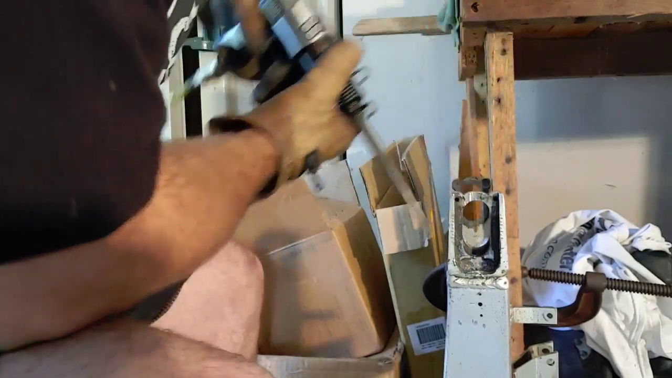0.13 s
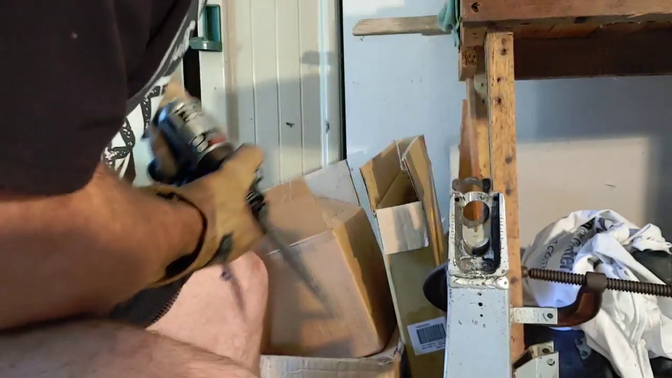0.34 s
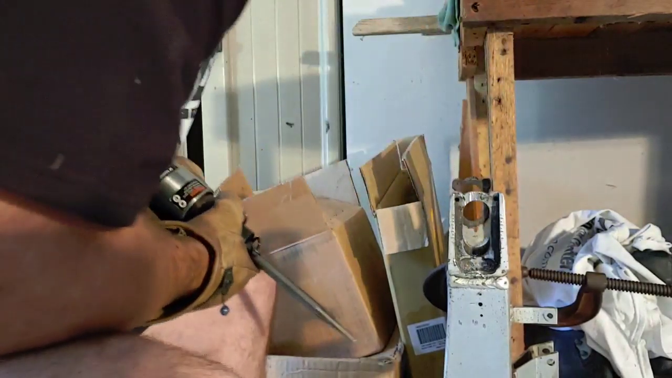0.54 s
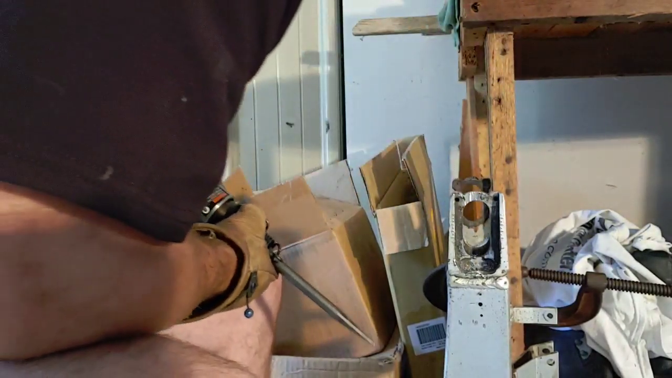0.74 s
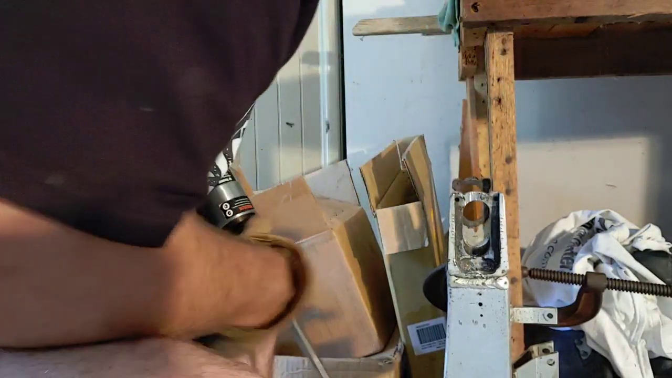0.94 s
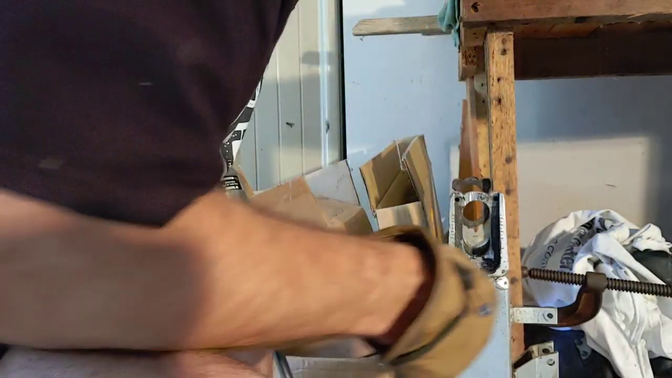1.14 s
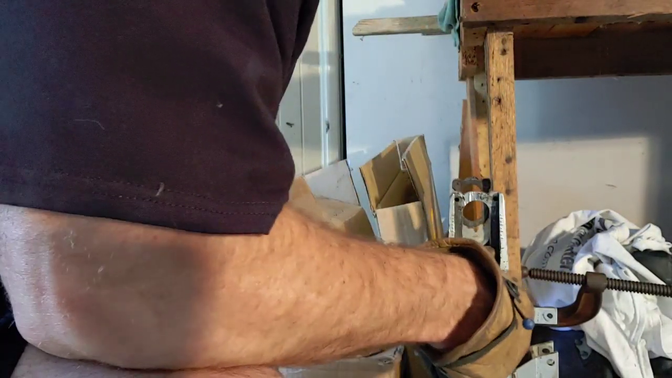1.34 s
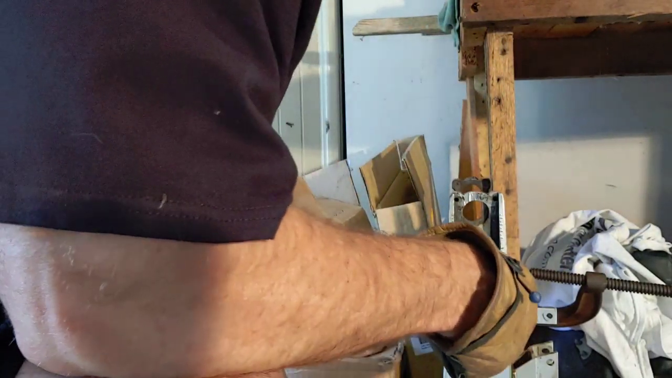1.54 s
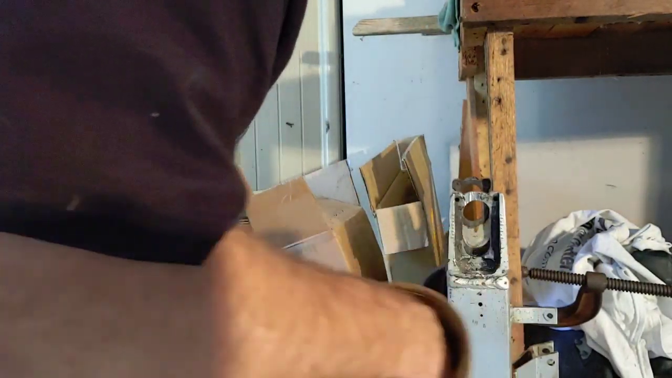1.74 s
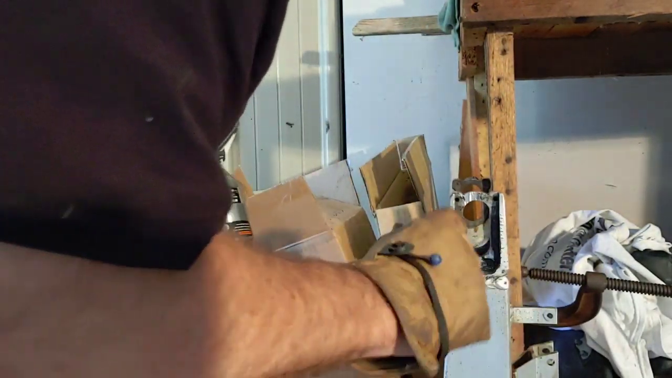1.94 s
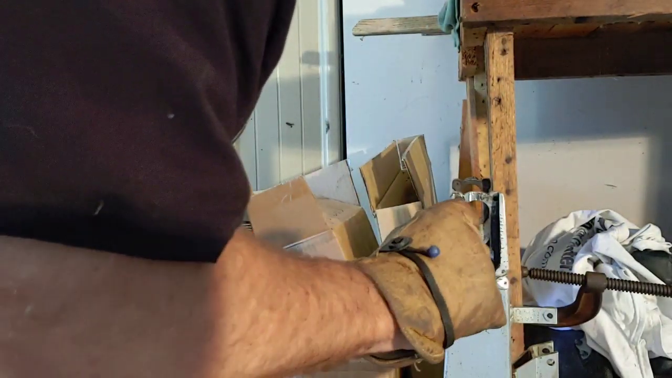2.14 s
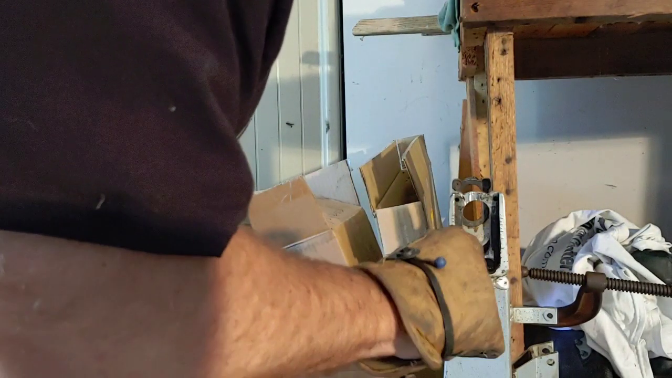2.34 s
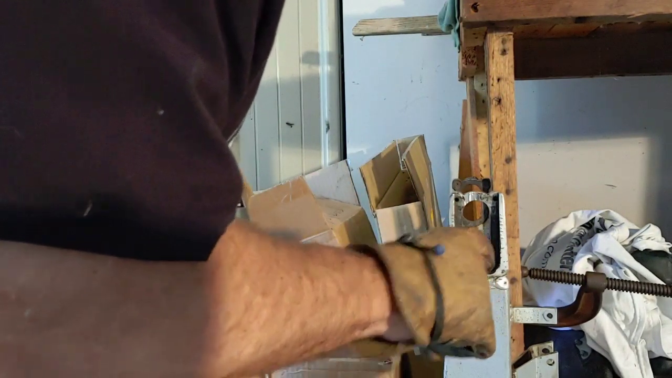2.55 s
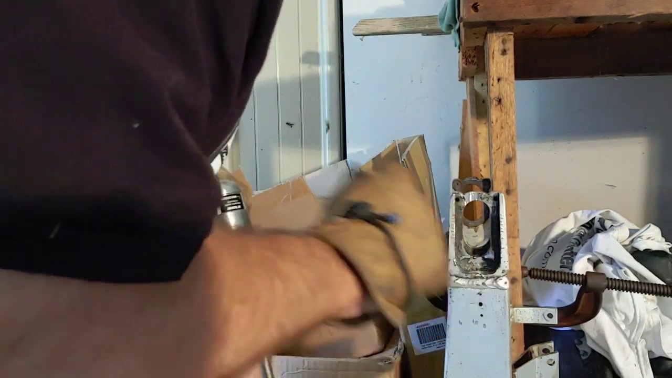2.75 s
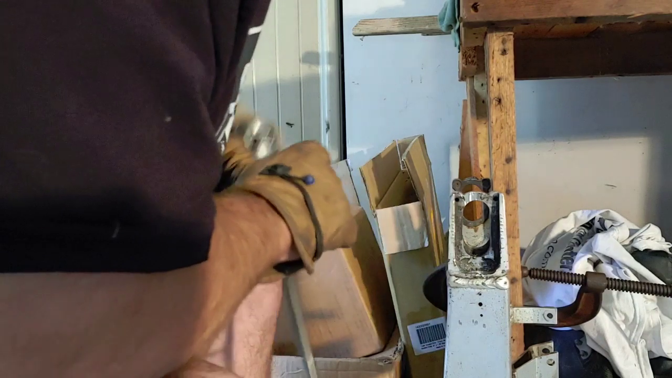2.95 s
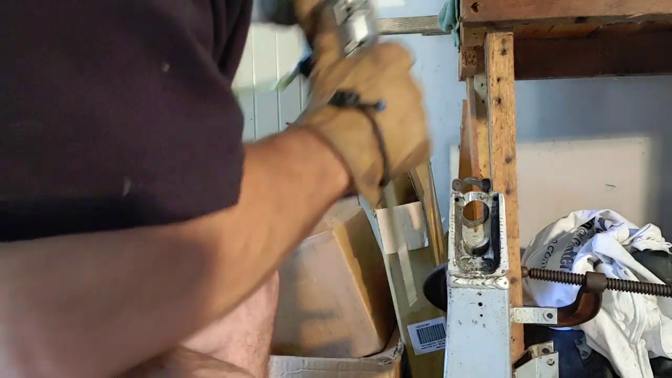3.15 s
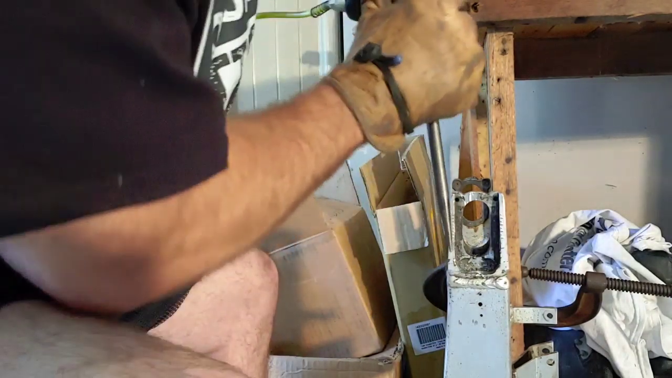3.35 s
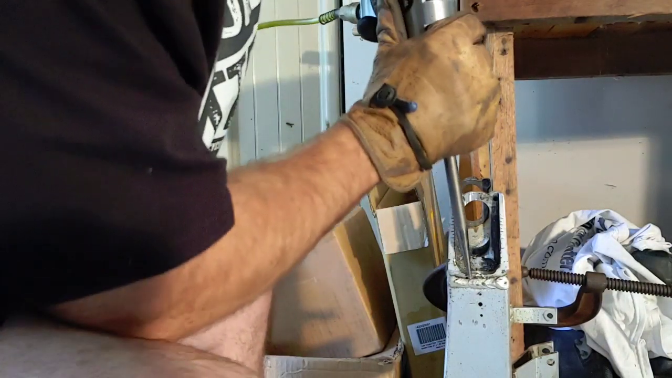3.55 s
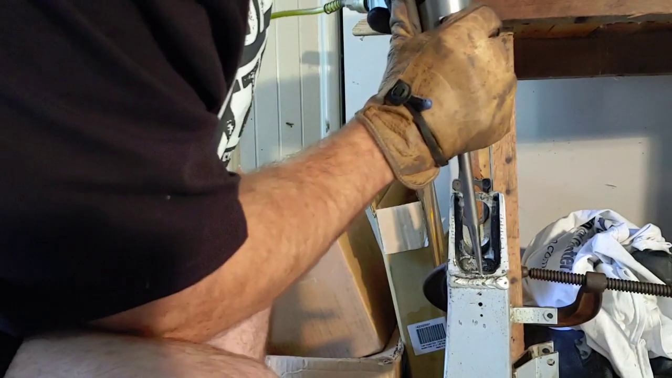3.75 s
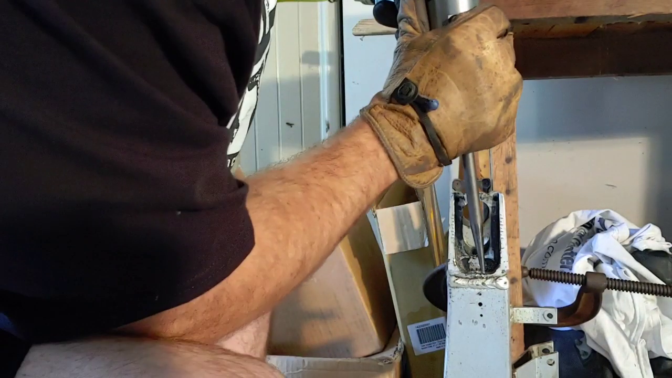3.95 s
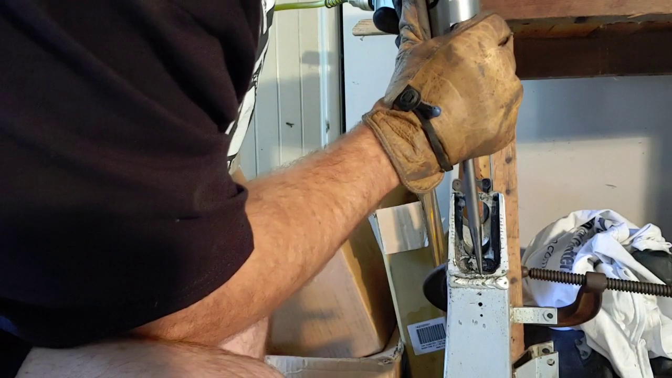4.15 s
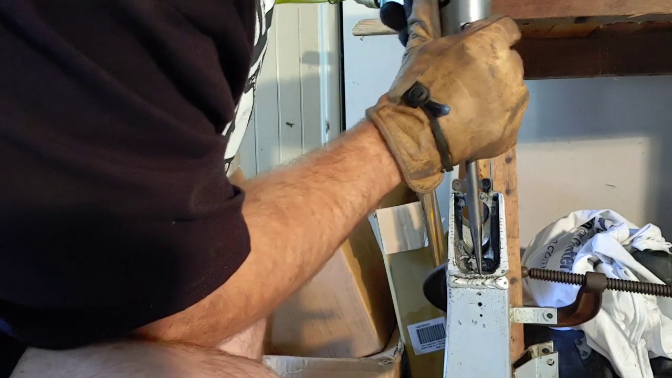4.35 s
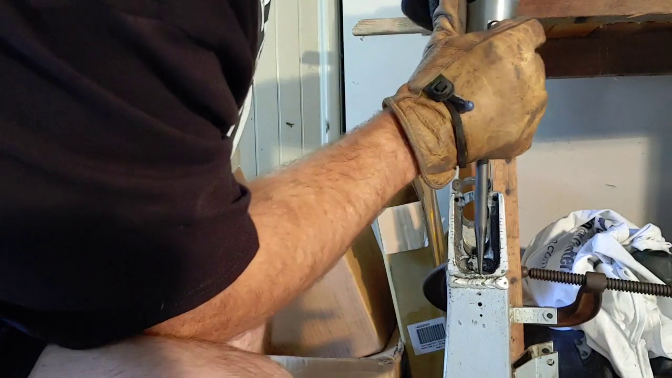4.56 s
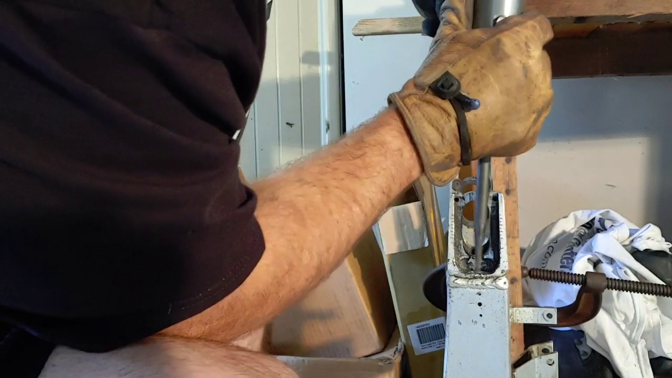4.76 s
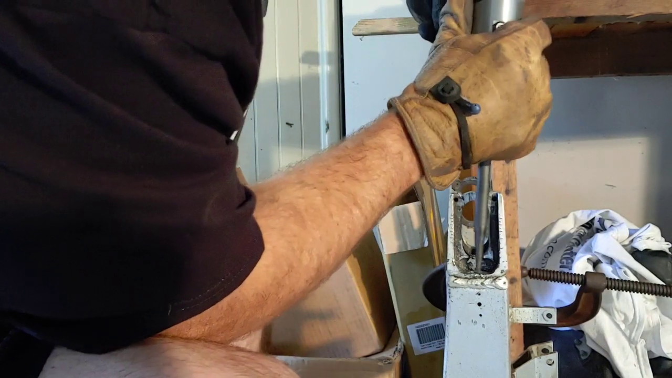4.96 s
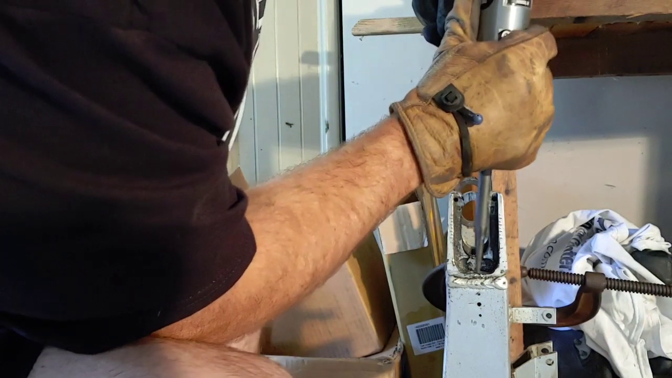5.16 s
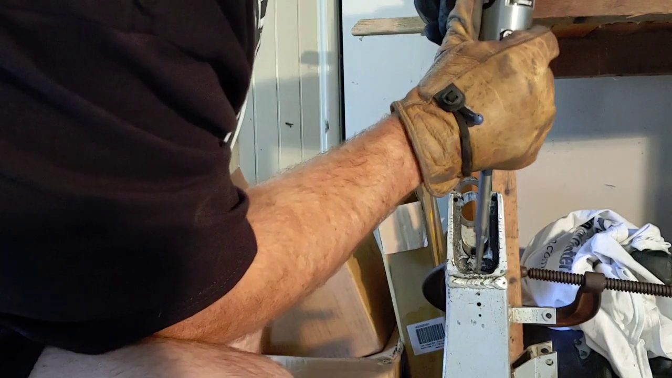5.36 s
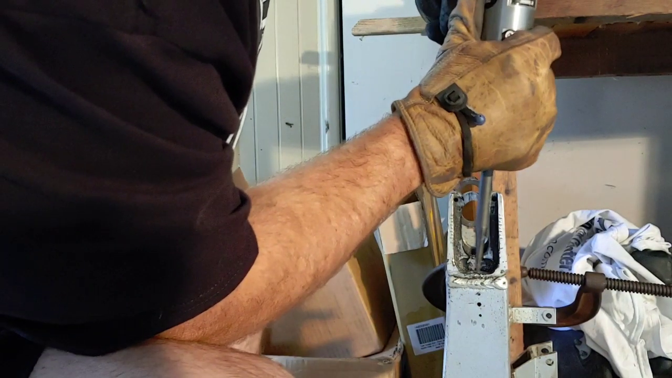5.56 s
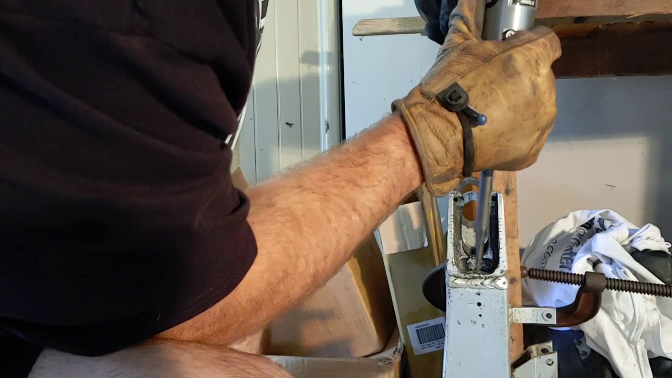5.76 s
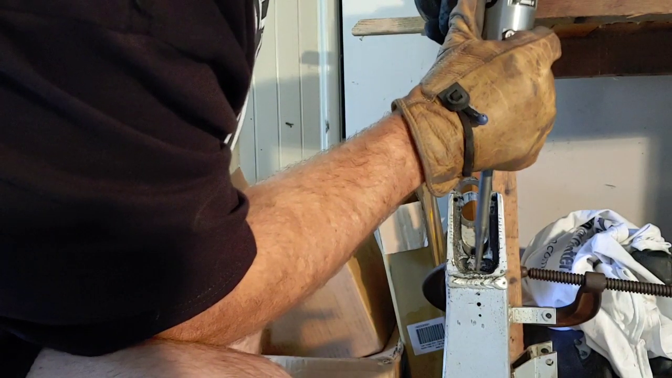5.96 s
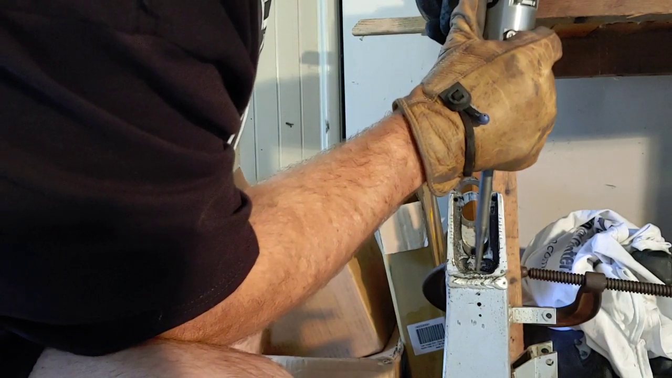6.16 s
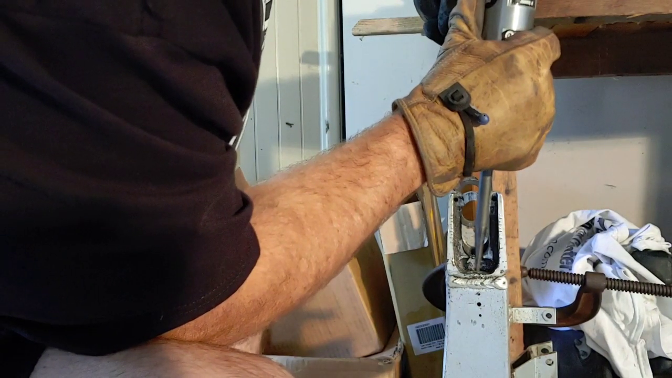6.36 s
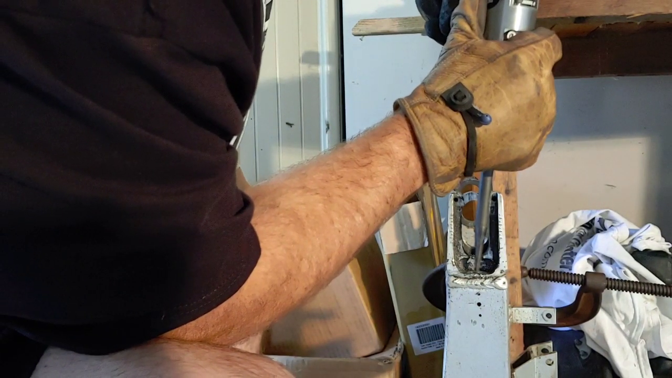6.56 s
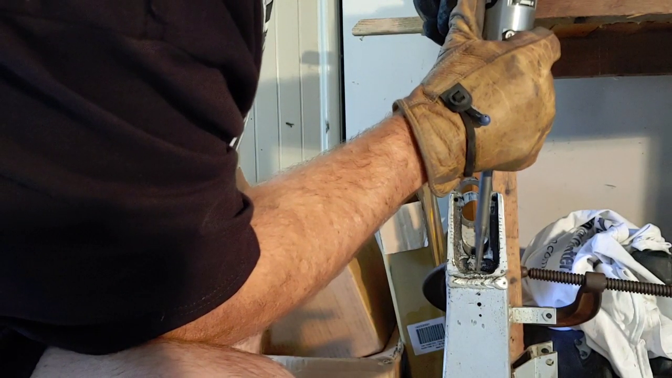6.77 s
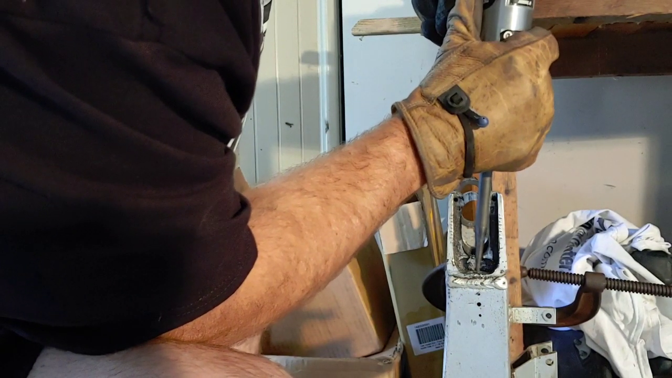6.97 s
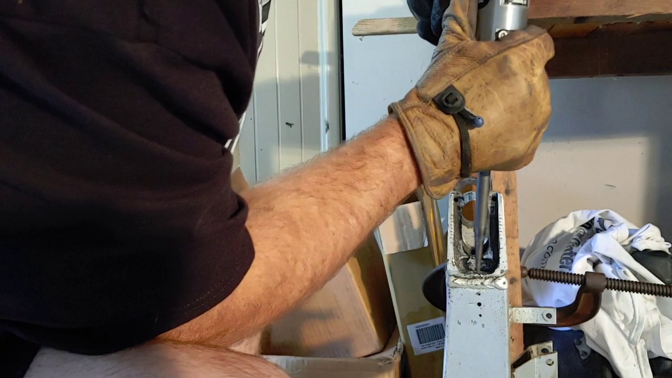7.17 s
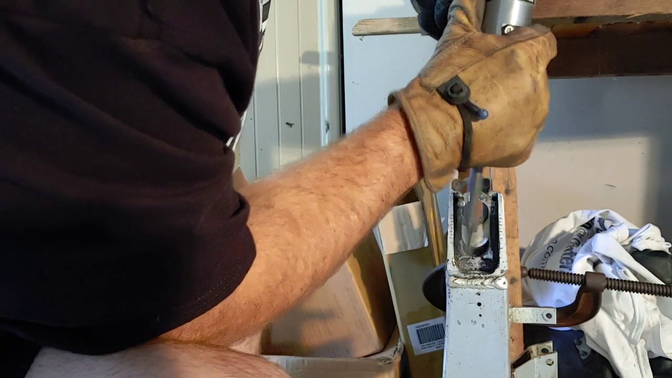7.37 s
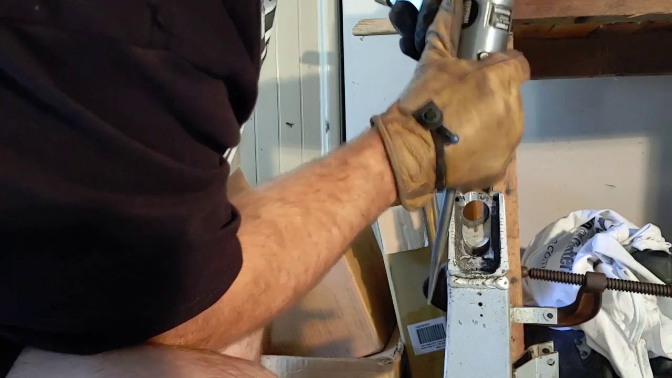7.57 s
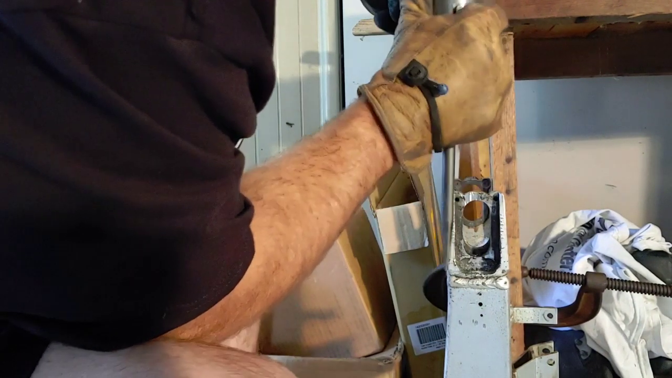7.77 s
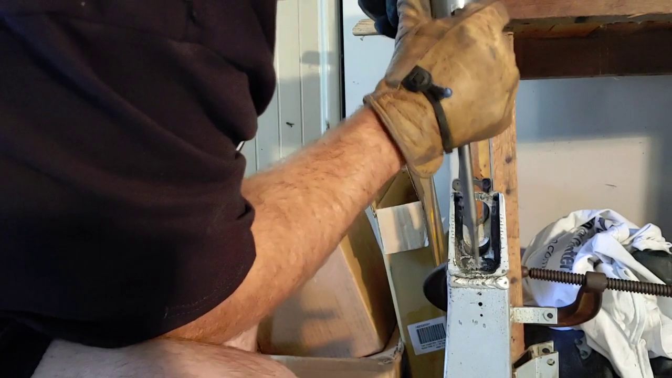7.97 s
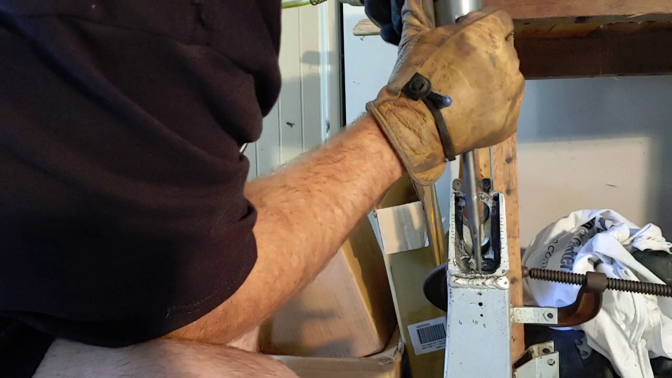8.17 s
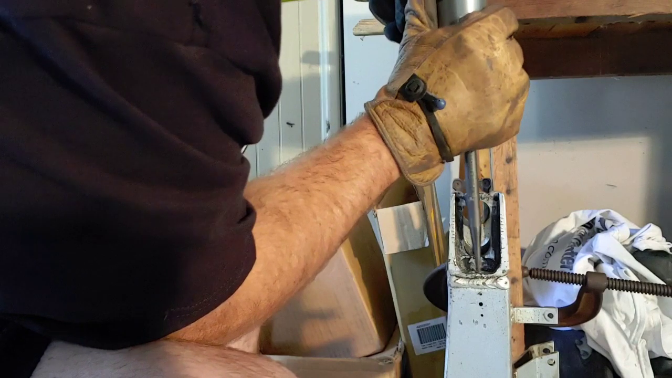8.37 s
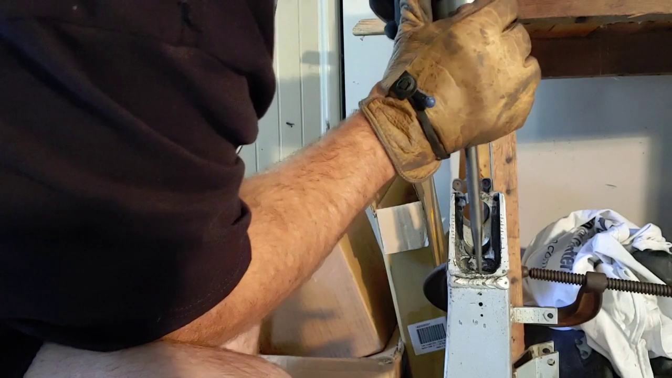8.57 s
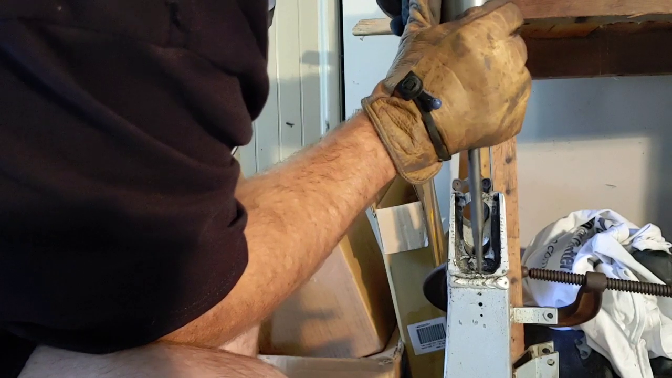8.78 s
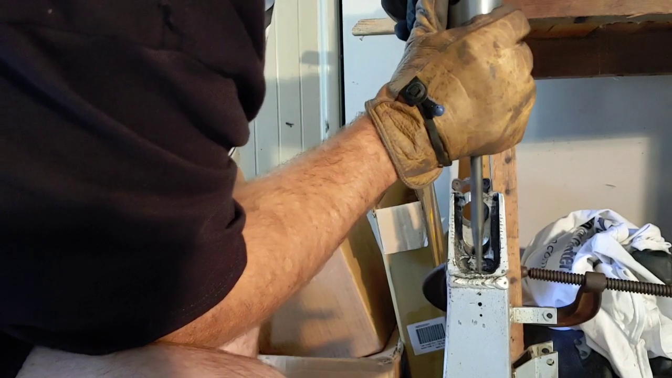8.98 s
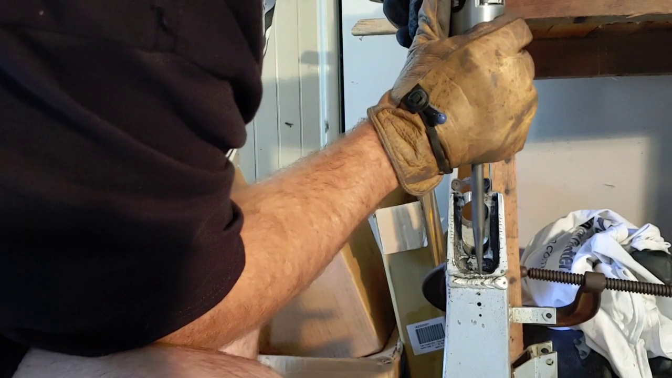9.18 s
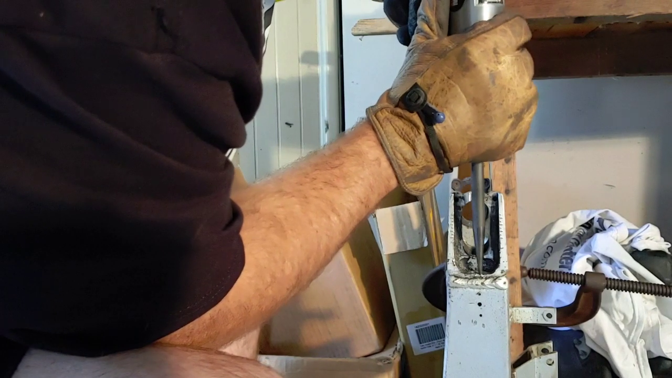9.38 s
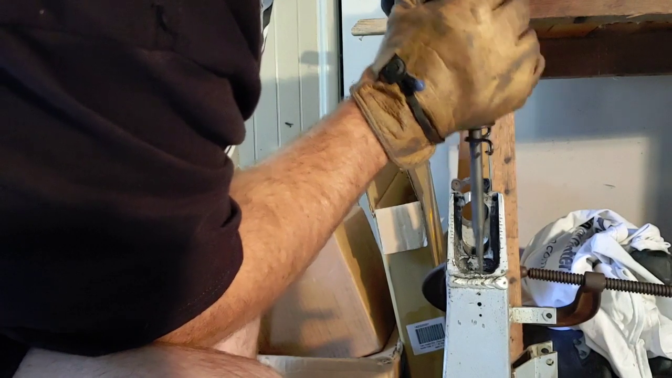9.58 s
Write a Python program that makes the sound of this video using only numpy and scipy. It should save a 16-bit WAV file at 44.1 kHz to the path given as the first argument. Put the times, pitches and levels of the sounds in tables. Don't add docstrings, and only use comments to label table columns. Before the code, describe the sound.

At 0 s the last blow of an air chisel clangs on steel, its ring and hiss fading within about half a second. As the recording level recovers over the first 0.4 s, a piston compressor drones low and buzzy, around 55 strokes a second, with airy valve noise, a thin high leak whistle and faint singing reeds around 0.5, 2 and 4 s. At 4.13 s two light metal taps land almost together. At 4.8 s the chisel bursts in, about 42 to 50 blows a second: loud bright steel clatter, clamp rattle, high ringing shank and exhaust hiss, ducking the compressor away. At 7.5 s the tip slips; the sound becomes duller, hissier and thumpier, with clamp rattle. From 8.55 s short catches bring ringing bites back, hardest from 9.2 s, while low gusts buffet the right side until about 9.6 s. Close, hard garage echo, saturated peaks.

```python
import sys
import numpy as np
from scipy import signal
from scipy.fft import rfft, irfft, next_fast_len
from scipy.io import wavfile
from scipy.ndimage import uniform_filter1d, minimum_filter1d

SR = 44100
rng = np.random.default_rng(int(sys.argv[2]) if len(sys.argv) > 2 else 0)


def master_out(mix):
    frames = np.transpose(np.atleast_2d(mix))
    ceiling = np.clip(frames, -1, 1)
    pcm = np.round(ceiling * 32767).astype(np.int16)
    wavfile.write(sys.argv[1], SR, pcm)


def voltage_ratio(decibels):
    exponent = np.asarray(decibels, float) / 20
    return 10 ** exponent


N = 424231
T_S = np.arange(N) / SR
TRIGGER_S = 4.8

# (frequency [Hz], width [Hz], level [dB])
BRACKET_MODES = [(2387, 14, -13.5), (2549, 31, -7), (2980, 31, -7), (3094, 13, -6.5), (3191, 19.5, 0.1),
                 (3171, 16, -2.5), (3530, 15, -13.5), (3750, 18, -7), (3820, 17, -12), (4254, 23, -4.5),
                 (4920, 37, -14), (6130, 18, -16)]


def unit(x):
    return x / np.sqrt(np.mean(x ** 2))


def curve(table):
    s, value = np.transpose(table)
    return np.interp(T_S, s, value)


def pan(db):
    return voltage_ratio(np.array([db / 2, -db / 2]).reshape(2, -1))


def butter(x, order, hz, kind="low"):
    return signal.sosfilt(signal.butter(order, hz, kind, fs=SR, output="sos"), x)


def noise(spectrum, like=0.0):
    size = next_fast_len(N)
    hz, db = np.transpose(spectrum)
    bin_hz = np.arange(size // 2 + 1) * SR / size
    gain = voltage_ratio(np.interp(np.log(bin_hz + 1), np.log(hz), db, left=-90, right=-90))
    mid, side = irfft(rfft(rng.standard_normal((2, size))) * gain, size)[:, :N]
    return unit(np.sqrt(1 + like) * mid + np.sqrt(1 - like) * side * np.array([[1], [-1]]))


def walk(rate_hz):
    hold = int(SR / rate_hz)
    steps = np.repeat(rng.standard_normal(N // hold + 1), hold)
    return unit(uniform_filter1d(steps, hold)[:N])


def swells(events, attack_s, release_s, rest_db):
    gain = voltage_ratio(rest_db)
    for s, length_s, db in events:
        rise = np.clip((T_S - s) / attack_s + 1, 0, 1)
        fade = np.exp(-np.maximum(T_S - s - length_s, 0) / release_s)
        gain = np.maximum(gain, voltage_ratio(db) * rise * fade)
    return 20 * np.log10(gain)


def ring(modes, at, size, scatter_db, turn_rad=1.67):
    out = np.zeros((2, N))
    for hz, width_hz, db in modes:
        push = np.zeros(N)
        np.add.at(push, at, size * voltage_ratio(scatter_db * rng.standard_normal(len(at))))
        pole = np.exp((2j * hz - width_hz) * np.pi / SR)
        z = signal.lfilter([1], [1, -pole], push)
        lag = np.exp(1j * turn_rad * rng.standard_normal())
        out += voltage_ratio(db) * width_hz * np.array([z.imag, (z * lag).imag])
    return out


def garage(x):
    t60_s, echo_gain = 0.3, voltage_ratio(-0.5)
    t = np.arange(SR // 2) / SR
    echo = rng.standard_normal((2, len(t))) * voltage_ratio(-60 * t / t60_s) * (t > 0.004)
    echo /= np.sqrt(np.sum(echo ** 2, axis=1, keepdims=True))
    wet = signal.oaconvolve(x, echo, axes=1)[:, :N]
    return (x + echo_gain * wet) / np.hypot(1, echo_gain)


def strokes(phase, stroke_hz):
    # (multiple, arm in the way [dB], arm lifted [dB], left minus right [dB], left lead [rad])
    low = [(1, -31, -31, 0, -0.1), (2, -39, -39, -2, -0.8), (3, -39, -39, -2, -0.3), (4, -37, -37, 0, -0.4),
           (5, -40, -40, 4, -0.7), (6, -29, -28, 2, -0.2), (7, -35, -35, -6, -0.8), (8, -37, -39, -5, -2.5),
           (9, -27, -26, 8, -2.1), (10, -40, -47, -5, 2.3), (11, -31, -27, 2, 0.5), (12, -38, -37, 0, 2.9),
           (13, -37, -40, 8, -2.0), (14, -33, -35, -3, 2.6), (15, -30, -30, -4, -2.8),
           (16, -35, -34, 7, 2.5), (17, -39, -41, 8, 0.5)]
    # (multiple, arm in the way [dB], arm lifted [dB],
    # left minus right [dB])
    high = [(18, -46, -45, -6), (19, -40, -40, 2), (20, -47, -46, 6), (21, -47, -47, 11),
            (24, -44, -45, -3), (25, -46, -46, 0), (26, -46, -42, 5), (32, -53, -53, 7), (33, -51, -49, 6),
            (38, -48, -45, 11)]
    left_late_s = 0.00054
    high = [(*row, -2 * np.pi * row[0] * stroke_hz * left_late_s) for row in high]
    lifted = np.interp(T_S, [2.8, 3.5], [0, 1])
    out = np.zeros((2, N))
    for k, low_db, up_db, pan_db, lead_rad in low + high:
        sway_db = min(k, 16) * (0.09 * walk(6) - 0.05)
        size = np.sqrt(2) * voltage_ratio(low_db + (up_db - low_db) * lifted + sway_db)
        shift = (0.3 + 0.1 * k) * rng.standard_normal()
        turn = k * phase + shift + np.array([[lead_rad], [-lead_rad]]) / 2
        out -= size * pan(pan_db) * np.cos(turn)
    return out


def valve_reeds(phase):
    # (time [s], length [s], multiple [1], level [dB])
    reeds = [
        (.5, 1.0, 41, -44),
        (2.15, .2, 55, -45),
        (2.0, .55, 61, -41),
        (3.75, 1.05, 64, -44),
    ]
    out = np.zeros((2, N))
    for s, length_s, k, db in reeds:
        size = np.sqrt(2) * voltage_ratio(swells([(s, length_s, db)], 0.1, 0.05, -90) + walk(8))
        out += size * pan(6) * np.cos(k * phase - np.array([[k * 0.18], [0]]))
    return out


def valve_noise(phase):
    # (frequency [Hz], density [dB per Hz])
    colour = [(30, -14), (100, -11), (300, -15), (560, -4), (700, -13), (1300, -16), (3000, -12),
              (4200, -11), (6000, -14.5), (8500, -8.5), (11000, -14.5), (13000, -23), (15000, -23.5),
              (15300, -50)]
    return noise(colour, like=0.042) * (1 + 0.074 * np.cos(phase)) * voltage_ratio(-25 + 1.06 * walk(14))


def leak():
    # (frequency [Hz], width [Hz], level [dB], left minus right [dB])
    bands = [(7470, 650, -29, -16.5), (9450, 520, -31.5, 2.5), (5700, 1140, -46.5, -30.5)]
    out = np.zeros((2, N))
    for hz, w, db, pan_db in bands:
        colour = [(hz - 2 * w, -30), (hz - w / 2, -3), (hz, 0), (hz + w / 2, -3), (hz + 2 * w, -30)]
        out += voltage_ratio(db + 0.67 * walk(12)) * pan(pan_db) * noise(colour)
    return out


def compressor():
    stroke_hz = 54.69
    recover_db, recover_db_per_s, duck_db, duck_s = -17.5, 48.5, -30, 0.04
    phase = 2 * np.pi * np.cumsum(stroke_hz * (1 + 0.0008 * walk(6))) / SR + 0.7
    gain_db = np.minimum(recover_db + recover_db_per_s * T_S, 0)
    gain_db += duck_db * np.clip((T_S - TRIGGER_S) / duck_s, 0, 1)
    out = strokes(phase, stroke_hz) + valve_reeds(phase) + valve_noise(phase) + leak()
    return out * voltage_ratio(gain_db)


def buffet():
    # (time [s], length [s], level [dB])
    gusts = [
        (8.83, 0.055, -26.5),
        (8.925, .08, -28),
        (9.04, .12, -35),
        (9.225, 0.058, -25),
        (9.3, 0.059, -30),
        (9.49, 0.063, -26),
        (9.58, 0.036, -29.5),
    ]
    colour = [(15, -9), (40, -5.5), (100, -7.5), (200, -13), (500, -19.5)]
    rumble = unit(noise(colour) * voltage_ratio(3.1 * walk(45)))
    return rumble * pan(-9) * voltage_ratio(swells(gusts, 0.023, 0.025, -90) + 3.5)


def touch():
    # (time [s], level [dB])
    taps = [
        (4.134, -23.5),
        (4.143, -24),
    ]
    s, db = np.transpose(taps)
    damped = [(hz, width + 50, d - 6 * (hz > 3600)) for hz, width, d in BRACKET_MODES if hz < 4500]
    tap = ring(damped, (s * SR).astype(int), voltage_ratio(db - 31.5), scatter_db=1.5, turn_rad=0.5)
    return 0.6 * tap + 0.5 * garage(tap)


def controls():
    # (time [s], steel level [dB])
    press = [(4.79, -35), (4.83, -19), (5.3, -18.5), (5.7, -17), (5.95, -21), (6.5, -19), (7.1, -17.5),
             (7.4, -19.5), (7.49, -18.5), (7.53, -31), (7.86, -26), (8.0, -30.5), (8.5, -26.5), (8.7, -26),
             (9.0, -24.5), (9.2, -22), (9.4, -20.5), (9.62, -24)]
    # (time [s], length [s], steel level [dB])
    bites = [
        (8.55, 0.013, -20),
        (8.59, 0.047, -17),
        (8.72, 0.027, -22),
        (8.86, 0.084, -21),
        (9.01, .045, -14.5),
        (9.115, 0.02, -16),
        (9.17, .02, -20),
        (9.23, .14, -15),
        (9.42, 0.11, -14),
        (9.575, .05, -13),
    ]
    # (time [s], length [s], level [dB])
    seated = [(4.825, 0.25, -12), (5.22, .44, -12.5), (5.76, 0.088, -13.5), (6.05, .12, -19),
              (6.45, 0.28, -15), (6.74, .08, -15), (6.9, 0.074, -16), (7.04, .25, -11), (7.41, .05, -12),
              (8.2, 0.048, -10), (8.6, .04, -11), (8.72, .06, -21), (8.99, .04, -17), (9.33, .04, -19),
              (9.46, .04, -15)]
    # (start level [dB], fall [dB per s])
    dying = [
        (-15.5, 72),
        (-11.5, 79),
        (-22, 34),
    ]
    slip_s, return_s, firm_db = 7.5, 7.9, -19

    sway_db = np.where(T_S > slip_s, 1.4, 1.0) * walk(25)
    steel = swells(bites, 0.011, 0.017, curve(press) + sway_db)
    slipped = np.clip((T_S - slip_s) / 0.029, 0, 1)

    clamp = -9.5 + 0.13 * np.maximum(firm_db - steel, 0) + 2.7 * slipped + 0.5 * walk(7.4)
    clamp += swells([(7.56, 0.32, 7.5)], 0.03, 0.05, 0)

    held_air_db, slipped_air_db, squeeze = -10.5, -12, 0.51
    air = held_air_db + (slipped_air_db - held_air_db) * slipped
    air -= squeeze * np.maximum(steel - firm_db, 0)
    air += np.interp(T_S, [TRIGGER_S - 0.01, TRIGGER_S + 0.019], [-13, 0])

    long_mode = swells(seated, 0.022, 0.02, -24 + 3.0 * walk(15))

    thump_db, kick_db, kick_s, free_thump_db = -34.5, 9, 0.16, -29.5
    thump = thump_db + kick_db * np.exp(-np.abs(T_S - TRIGGER_S) / kick_s) + 0.84 * walk(9)
    thump += (free_thump_db - thump_db) * np.clip((T_S - slip_s) / 0.083, 0, 1)
    thump += -1.5 * (T_S > return_s)

    before = T_S < TRIGGER_S - 0.01
    steel, air, long_mode = (np.where(before, np.maximum(db - fall * T_S, -70), now)
                             for (db, fall), now in zip(dying, (steel, air, long_mode)))
    steel = swells([(0.018, 0.008, -13.5)], 0.006, 0.016, steel)
    clamp = np.where(before, -7.0, clamp)
    thump = np.where(T_S < TRIGGER_S + 0.02, -90, thump)
    return steel, clamp, air, long_mode, thump


def exhaust(blows, db):
    # (frequency [Hz], width [Hz], level [dB])
    modes = [(110, 81, -0.5), (185, 51, 0.5), (294, 47, 2), (359, 56, 0), (510, 73, -15), (688, 136, -8.5)]
    thump = unit(np.gradient(ring(modes, blows, 1.0, scatter_db=1.2, turn_rad=0.4), axis=1))
    thump = unit(butter(thump, 2, 1000))
    colour = [(50, -8), (100, 2), (200, -2), (400, 0), (900, -3), (1300, -6), (1700, -30)]
    rumble = noise(colour, like=0.3) * voltage_ratio(-36.5 + 1.5 * walk(10))
    running = curve([(4.81, 0), (4.83, 1)])
    return butter(thump * voltage_ratio(db) + running * rumble, 3, 75, "high")


def free_air(puff, bite):
    # (frequency [Hz], density [dB per Hz])
    colour = [(2350, -50), (4000, -19.5), (5060, -16.5), (6780, -8.5), (7430, -5), (7820, -0.5), (8530, -4),
              (9960, -12.5), (12700, -15.5), (14800, -12.5), (15800, -13)]
    air = unit(noise(colour) * (1 + 0.3 * puff) * voltage_ratio((3.2 - 1.5 * bite) * walk(350)))
    finest = butter(air, 4, 10500, "high")
    return butter(air, 4, 10500) + finest * (0.53 + 0.74 * bite)


def escaping_air():
    squeal = noise([(5600, -28.5), (6050, 4), (6500, -3), (7200, -5), (7600, -30)])
    squeal = squeal * voltage_ratio(swells([(8.71, 0.08, -17)], 0.03, 0.03, -90) + 2.5 * walk(100))
    whistle = noise([(11300, -30), (12000, 0), (12700, -30)])
    return squeal + whistle * voltage_ratio(swells([(7.55, 0.05, -22)], 0.03, 0.025, -90))


def bracket_ring(at, size, bite, rough):
    # (frequency [Hz], density [dB per Hz])
    clatter = [(1800, -66), (2300, -3.5), (3100, -2), (4400, -3), (5200, -5.5), (6800, -11.5), (8000, -32)]
    struck = np.where(T_S < TRIGGER_S, 0.6, 0.68)
    tone = unit(ring(BRACKET_MODES, at, size, scatter_db=4, turn_rad=0.7))
    return (0.15 + 0.68 * bite) * tone + struck * noise(clatter, like=0.4) * rough


def clamp_ring(at, size, rough):
    # (frequency [Hz], width [Hz], level [dB])
    modes = [(1425, 14, -3), (1592, 16, 0), (1960, 22, -3), (2245, 20, -5)]
    rattle = noise([(900, -3), (1200, -7.5), (2200, 0.0), (2600, -32)], like=0.14)
    return 0.48 * unit(ring(modes, at, size, scatter_db=5.5)) + 0.5 * rattle * rough


def shank_ring(at, size):
    # (frequency [Hz], width [Hz], level [dB])
    first_grip = [(6840, 20, -9), (7505, 30, -3), (7570, 25, -6), (7948, 20, 0), (8130, 20, -6),
                  (8262, 20, -6), (8580, 20, -5), (8660, 20, -2), (8782, 20, -2), (8868, 25, -2),
                  (8975, 18, 0), (9157, 20, -3), (9275, 20, -6), (10300, 25, -10)]
    # (frequency [Hz], width [Hz], level [dB])
    new_grip = [(6670, 30, -23), (7180, 26, -16), (8090, 49, 6), (8540, 26, -5), (9200, 60, -11.5),
                (9150, 30, -22), (9400, 23, -19), (10000, 62, -18)]
    regrip_s = 9.23
    regripped = np.interp(T_S, [regrip_s, regrip_s + 0.023], [0, 1])
    first = unit(ring(first_grip, at, size, scatter_db=0.5))
    return (1 - regripped) * first + regripped * unit(ring(new_grip, at, size, scatter_db=2))


def long_mode_ring(at, size):
    # (frequency [Hz], width [Hz], level [dB])
    modes = [(7180, 16, 0)]
    return unit(ring(modes, at, size, scatter_db=2.5)) * pan(-3)


def chisel():
    # (time [s], rate [blows per s])
    blow_rate = [(4.82, 43.41), (5.02, 41.68), (5.4, 50.52), (5.6, 49.88), (6.7, 49.61), (7.0, 48.08),
                 (7.25, 49.91), (7.45, 47.92), (7.62, 42.34), (7.8, 46.41), (8.3, 45.98), (8.8, 43.52),
                 (9.02, 40.85), (9.35, 47.5), (9.62, 45.28)]
    cycle = np.cumsum(curve(blow_rate)) / SR + 0.76
    blows = np.flatnonzero(np.diff(np.floor(cycle)))
    jitter = (6 * rng.standard_normal(len(blows))).astype(int)
    blows = np.clip(blows + jitter, 0, N - 1)
    chatter = rng.integers(0, N, size=3600)
    at = np.concatenate([blows, chatter])
    size = np.concatenate([np.ones(len(blows)), 0.48 * rng.standard_normal(len(chatter))])
    puff = np.exp(-(cycle % 1) / 0.082)

    steel_db, clamp_db, air_db, long_db, thump_db = controls()
    bite = np.clip((steel_db - air_db + 19) / 10, 0, 1)
    rough = (1 + 0.12 * puff) * voltage_ratio(0.36 * walk(40))

    bracket = bracket_ring(at, size, bite, rough) * pan(-0.5)
    clamp = clamp_ring(at, size, rough) * pan(0.5) * voltage_ratio(clamp_db)
    shank = 0.82 * bite * shank_ring(at, size) * pan(2.5)
    air = np.sqrt(1 - 0.68 * bite ** 2) * free_air(puff, bite) * pan(1.5)
    hits = (bracket + clamp) * voltage_ratio(steel_db + 4.0) + (shank + air) * voltage_ratio(air_db + 2.5)
    hits += np.sqrt(bite) * long_mode_ring(at, size) * voltage_ratio(long_db - 0.7)
    hits = butter(hits, 2, 300, "high")
    thump = exhaust(blows, thump_db)
    return garage(hits + escaping_air() + 0.6 * thump) + 0.86 * thump


def scene():
    return compressor() + buffet() + touch() + chisel()


def starve(x):
    # (frequency [Hz], level against neighbours [dB])
    limits = [(2500, -5), (3500, -4), (4200, -3), (4700, -2), (5700, -1.9), (6400, -5), (11300, -3.5),
              (12300, -1.2), (13300, -1.2), (14200, -3), (15720, -5), (15760, 99)]
    hz, _, z = signal.stft(x, SR, nperseg=2048)
    power = uniform_filter1d(np.sum(np.abs(z) ** 2, axis=0), size=10, axis=0)
    level_db = 10 * np.log10(uniform_filter1d(power, size=2, axis=1) + 1e-20)
    dip_db = level_db - uniform_filter1d(level_db, size=50, axis=0)
    kept = dip_db > np.interp(hz, *np.transpose(limits), left=-99)[:, None]
    kept = minimum_filter1d(1.0 * kept, size=6, axis=0)
    return signal.istft(z * kept, SR, nperseg=2048)[1][:, :N]


def top_cut(x):
    return signal.sosfilt(signal.butter(12, 15900, fs=SR, output="sos"), x)


def record(dry):
    rounded = np.clip(np.tanh(0.8 * starve(dry)) / 0.8, -1, 1)
    return top_cut(rounded)


dry = scene()
out = record(dry)
master_out(out)
```